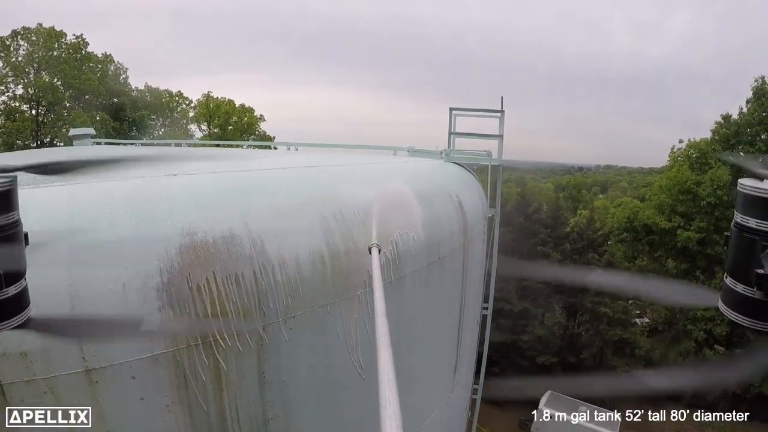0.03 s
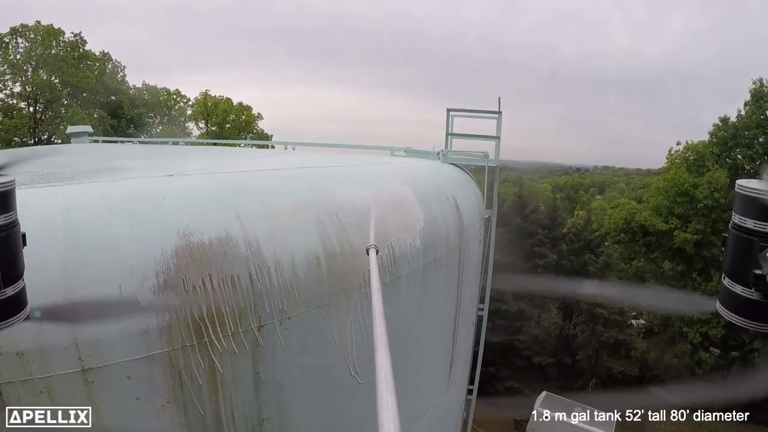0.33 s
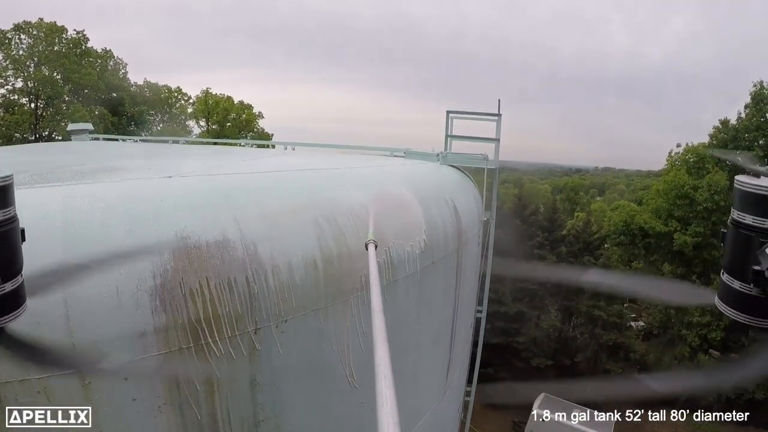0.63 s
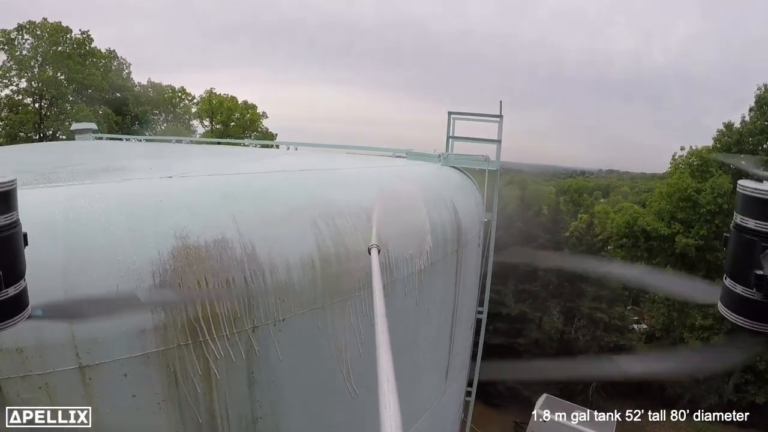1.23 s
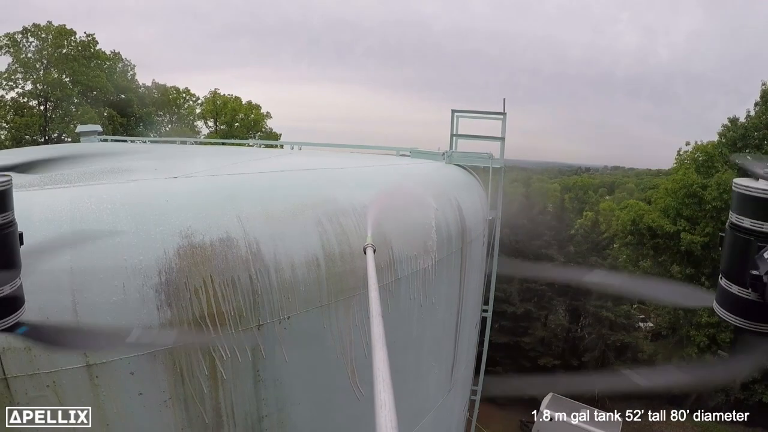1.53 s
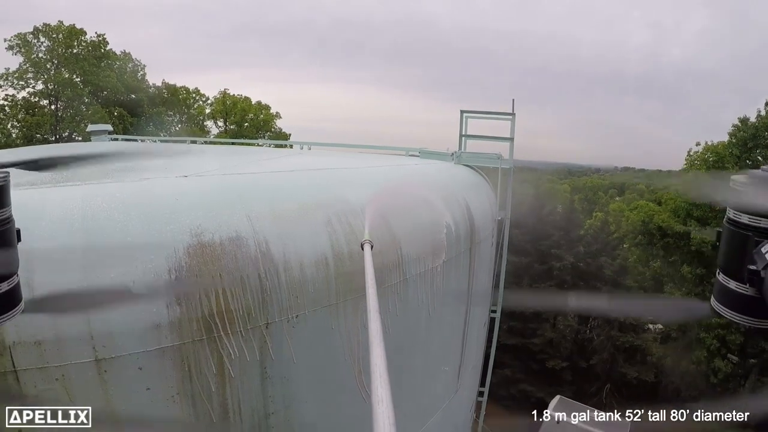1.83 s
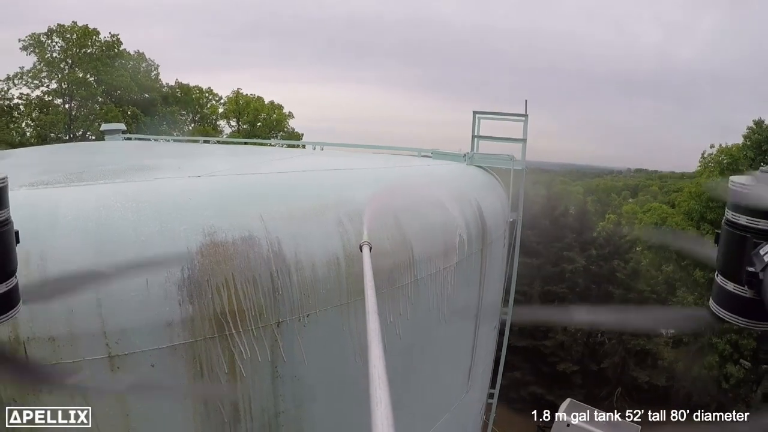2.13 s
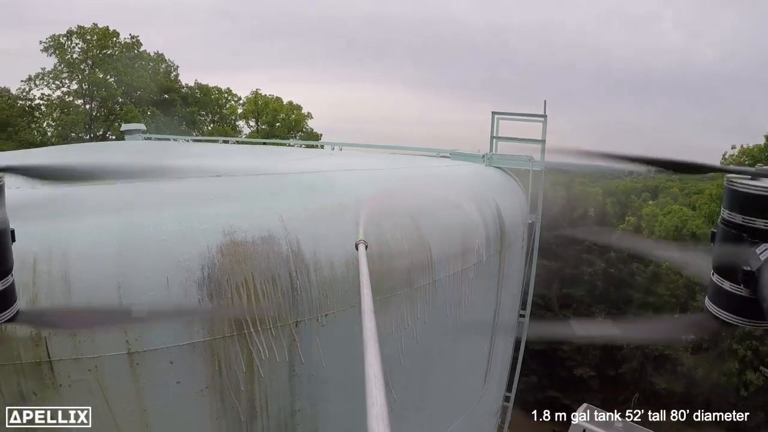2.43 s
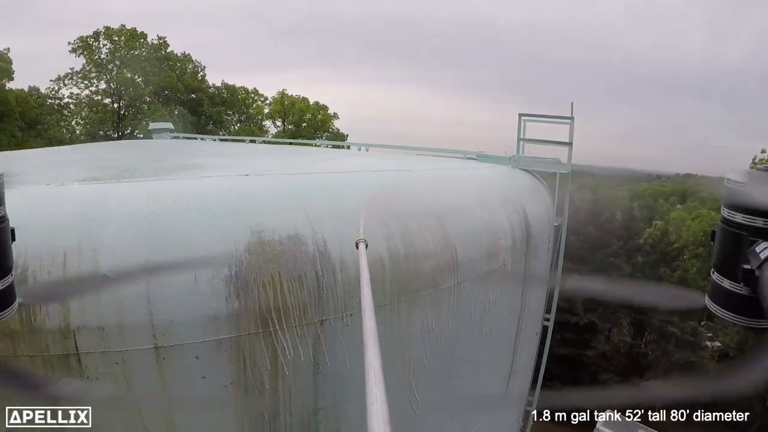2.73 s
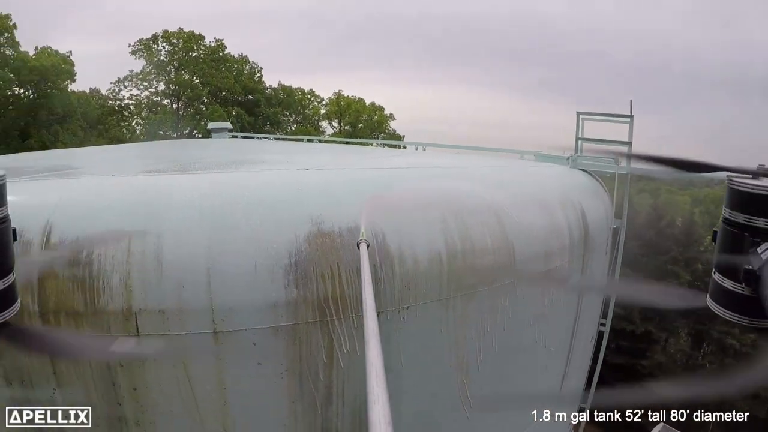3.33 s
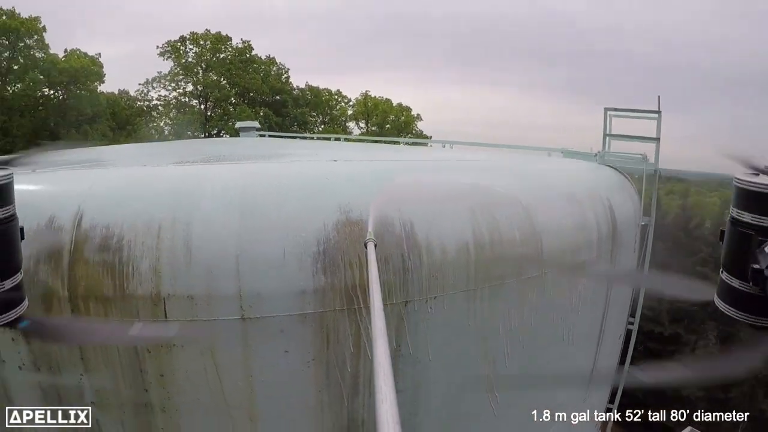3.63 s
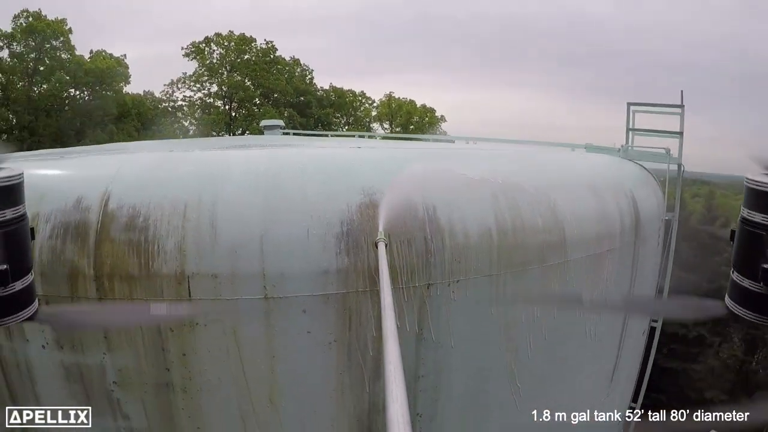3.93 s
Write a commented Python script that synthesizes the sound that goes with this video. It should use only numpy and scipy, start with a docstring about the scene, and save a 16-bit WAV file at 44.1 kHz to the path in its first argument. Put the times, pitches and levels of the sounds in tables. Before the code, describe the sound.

A heavy drone hovers outdoors, heard from its own body. Its propellers hum and roar throughout, their pitches drifting and throbbing against each other, while the motors whine thinly and a water jet hisses faintly underneath.

```python
"""A heavy drone hovers beside a storage tank and washes it with a water jet, heard from its own frame.
Its two-bladed rotors spin at slightly different, drifting speeds, so their tones clash and throb,
and each motor whines. The blades chop the roaring air they push down. Beneath that, the spray
hisses and sputters faintly, and there are three tiny ticks."""
import sys
import numpy as np
from scipy import signal
from scipy.fft import rfft, irfft
from scipy.io import wavfile
from scipy.ndimage import uniform_filter1d, minimum_filter1d

SR = 44100
rng = np.random.default_rng(int(sys.argv[2]) if len(sys.argv) > 2 else 0)


def put_to_file(sound):
    """Save the sound as 16-bit audio at rate SR, in the file named by the first command-line argument."""
    columns = np.atleast_2d(sound).T  # one column per channel
    safe = np.clip(columns, -1, 1)
    whole_steps = np.round(safe * 32767)
    wavfile.write(sys.argv[1], SR, whole_steps.astype(np.int16))


N = 176400  # 4 seconds


def undb(db):
    """Turn decibels into a number to multiply a sound by."""
    return 10 ** (np.asarray(db) / 20)


def curve(table, column=1):
    """Join one column of a time table with straight lines, giving a value for every sample."""
    rows = np.array(table, float)
    return np.interp(np.arange(N) / SR, rows[:, 0], rows[:, column])


def wander(per_s):
    """A smooth random wiggle of typical size 1, with about `per_s` new values a second."""
    freqs = np.fft.rfftfreq(N, 1 / SR)
    wiggle = irfft(rfft(rng.standard_normal(N)) * np.exp(-(2 * freqs / per_s) ** 2), N)
    return wiggle / wiggle.std()


def colour(noise, spectrum):
    """Make white noise stronger at some pitches and weaker at others, following a table."""
    hz, db = np.array(spectrum, float).T
    freqs = np.maximum(np.fft.rfftfreq(N, 1 / SR), 1)
    gain = undb(np.interp(np.log(freqs), np.log(hz), db))
    return irfft(rfft(noise) * gain, N) * np.sqrt(SR / 2)


def band_gain(sound, db, hz, width_hz):
    """Turn the part of a sound near one pitch up or down over time."""
    freqs = np.fft.rfftfreq(N, 1 / SR)
    band = irfft(rfft(sound) * np.exp(-((freqs - hz) / width_hz) ** 2), N)
    return sound + (undb(db) - 1) * band


def turn(hz, jitter=0.001578):
    """The angle of a spinning shaft whose speed keeps getting tiny adjustments."""
    speed = hz * (1 + jitter * wander(25.5))
    return 2 * np.pi * (rng.random() + np.cumsum(speed) / SR)


def tone(angle, db):
    """A pure tone at an average (rms) level, starting anywhere in its cycle."""
    return np.sqrt(2) * undb(db) * np.sin(angle + 2 * np.pi * rng.random())


def ticks(fade_s=.00004):
    """Tiny, dry clicks that start sharply and die at once."""
    # faint clicks (time [s], peak level [dB])
    clicks = [(.993, -39), (1.825, -45.5), (2.678, -39)]
    t = np.arange(N) / SR
    return sum(undb(db) * (t >= at) * np.exp(-abs(t - at) / fade_s) for at, db in clicks)


def surges(width_s=0.013):
    """Brief jumps and dips in level, in dB: the spray follows them fully, the air and rasp partly."""
    # surges and lulls (time [s], level change of the spray [dB])
    bumps = [(.09, -4), (.54, 2.5), (.72, 2.5), (.785, 2.5), (.915, -3.5), (1.12, 3.5), (1.19, 3.5),
             (1.825, 3), (2.835, 5), (2.98, 2.5), (3.04, 3.5), (3.25, -2.5), (3.335, 7), (3.569, 2.5),
             (3.635, 6), (3.72, 2.5), (3.799, 4.5), (3.9, -4)]
    t = np.arange(N) / SR
    return sum(db * np.exp(-((t - at) / width_s) ** 2) for at, db in bumps)


def spray(chop):
    """Fine droplets make a flickering hiss that the blades chop."""
    # hiss of the water (frequency [Hz], level [dB per Hz])
    spectrum = [(900, -115), (2200, -92), (2700, -101), (3050, -95.5), (3500, -99), (3750, -99),
                (3870, -92.5), (4030, -92.5), (4300, -93.5), (4720, -105), (5120, -108), (5300, -103),
                (5600, -104), (5900, -99), (6200, -100.5), (6500, -99.5), (7200, -104), (7800, -111),
                (8700, -112), (10300, -127), (11300, -133), (12600, -123), (13600, -133), (16000, -140)]
    # slow rise and fall of the hiss (time [s], level change [dB])
    drift = [(0, 0.5), (.7, 0), (1.5, -1), (2.3, 0.5), (3.1, -0.25), (4, -0.5)]
    flicker_db = 0.67 * wander(74)
    droplet_db = -wander(2000)
    gain = undb(flicker_db + droplet_db + surges() + curve(drift))
    return colour(rng.standard_normal(N) * gain * (1 + 0.35 * chop), spectrum)


def downwash(chop):
    """The swirling air pushed down by the rotors gusts, and pulses as the blades pass."""
    # roar of the air (frequency [Hz], level [dB per Hz])
    spectrum = [(15, -75.5), (36, -69.5), (52, -58), (80, -56), (125, -59.5), (165, -69.5), (195, -61),
                (228, -55.5), (292, -74), (335, -62), (388, -63), (460, -55), (540, -66.5), (660, -65.5),
                (790, -72), (850, -72), (920, -72.5), (1040, -81), (1130, -75.5), (1210, -81),
                (1320, -74.5), (1420, -77.5), (1600, -70), (1700, -75.5), (1840, -87), (2200, -94.5),
                (2700, -104), (5000, -125), (16000, -150)]
    gust = undb(1.8 * wander(90) + 0.4 * surges())
    return colour(rng.standard_normal(N) * gust * (1 + 0.49 * chop), spectrum)


def air_and_water(slow, middle, fast):
    """Air and spray pulse together with the blades of three rotors, twice for each turn."""
    # bands that swell and fade on their own (frequency [Hz], width [Hz], typical swing [dB])
    swells = [(1570, 33, 2.6), (4100, 100, 2.5)]
    chop = 0.35 * np.cos(2 * fast) + 0.11 * np.cos(2 * slow) + 0.15 * np.cos(2 * middle)
    noise = downwash(chop) + spray(chop)
    for hz, width_hz, swing_db in swells:
        noise = band_gain(noise, swing_db * wander(9.4), hz, width_hz)
    return noise


def whine(shaft_hz, db, overtones=(), poles=28, wobble=.002, flutter_db=2):
    """A motor's magnets sweep past its coils and whistle, wobbling with each change of speed."""
    angle = poles * turn(shaft_hz * (1 + wobble * wander(9)))
    level_db = db + flutter_db * wander(13)
    whistle = tone(angle, level_db)
    return whistle + sum(tone(round(k) * angle, level_db + offset) for k, offset in overtones)


def motors(slow_hz, middle_hz, fast_hz, fastest_hz):
    """The four nearest motors whine; higher whistles of the faster two come and go."""
    # whine of the faster two (time [s], fast motor level [dB], fastest motor level [dB])
    levels = [(0, -65, -60), (.52, -62, -61), (.62, -51, -62), (.88, -51.5, -62), (1.0, -60, -62),
              (1.35, -63, -61), (2.2, -64, -62), (3.08, -62, -62), (3.16, -48, -63), (3.55, -48, -64),
              (4, -47.5, -63)]
    # overtones of the fastest motor (multiple of its pitch, level next to its whine [dB])
    overtones = [(2, -18), (3, -24), (5, -35)]
    # fast motor's whistle at three times its pitch (time [s], level [dB])
    triple_level = [(0, -78), (1.2, -78), (1.7, -88), (4, -92)]
    # fastest motor's whistle at twice its pitch (time [s], level [dB])
    double_level = [(0, -78), (.45, -78), (.56, -68), (.68, -79), (1.12, -78), (1.25, -67), (1.4, -79),
                    (1.68, -79), (1.8, -68), (1.95, -77), (2.75, -76), (3.2, -80), (4, -82)]
    high = whine(3 * fast_hz, curve(triple_level)) + whine(2 * fastest_hz, curve(double_level))
    steady = whine(slow_hz, db=-61) + whine(middle_hz, db=-57.5)
    changing = whine(fast_hz, curve(levels, 1)) + whine(fastest_hz, curve(levels, 2), overtones)
    return high + steady + changing


def boom_and_hum(roar):
    """A low boom and the hum of the blades above it each swell and fade."""
    # the boom (time [s], level change [dB])
    boom = [(0, -0.5), (.35, -6.5), (.56, 4.5), (.64, 4), (.72, 8.5), (.82, 2), (1.0, -0.5), (1.5, 3),
            (2.0, 1), (2.5, 1), (3.0, 2.5), (3.35, 3.5), (3.75, 5.5), (4, 1)]
    # the blade hum (time [s], level change [dB])
    hum = [(0, -3), (.4, 0), (.8, 1), (1.5, 0), (2.2, -0.5), (2.8, .5), (3.4, 0), (4, 0)]
    roar = band_gain(roar, curve(boom), hz=217, width_hz=22)
    return band_gain(roar, curve(hum), hz=460, width_hz=83)


def blade_rasp(roar, slow, fast):
    """The rasp throbs when the blades of two neighbouring rotors pass together, and pulses each turn."""
    # slow rise and fall of the rasp (time [s], level change [dB])
    drift = [(0, 2.5), (.6, -0.5), (1.2, -1), (1.9, 2), (2.5, 1), (3.1, -1), (3.6, -1), (4, -4.5)]
    throb_db = 2.5 * np.cos(2 * (fast - slow))
    pulse_db = 1.3 * np.cos(fast)
    return band_gain(roar, curve(drift) + throb_db + pulse_db + .3 * surges(), hz=760, width_hz=200)


def rotor(angle, tones_db):
    """An off-balance shaft and its blades make a stack of tones; rough air shakes the high ones more."""
    flutter_db = 1.1 * wander(13)
    sound = np.zeros(N)
    for multiple, db in enumerate(tones_db, start=1):
        own_flutter_db = np.roll(flutter_db, rng.integers(N))  # shifted in time for each tone
        sound += tone(multiple * angle, db + min(multiple / 5, 1) * own_flutter_db)
    return sound


def far_rotors(near_speeds, drift=0.00786):
    """The farther rotors loosely follow the shared throttle and thicken the hum."""
    # one row per rotor (average shaft speed [Hz], level change [dB])
    rotors = [(45.2, -9.5), (51.3, -5.5), (55.6, -0.5), (60.3, -9.5)]
    # tones at 1, 2, 3... times the shaft speed (level before each rotor's change [dB])
    tones_db = [-53.5, -43, -65.5, -48, -59, -60, -58.5, -43, -50, -48.5, -52, -54, -58, -60, -59, -64]
    throttle = np.mean([hz / hz.mean() for hz in near_speeds], axis=0)
    sound = np.zeros(N)
    for hz, db in rotors:
        speed = hz * throttle * (1 + drift * wander(2.896))
        sound += undb(db) * rotor(turn(speed), tones_db)
    return sound


def near_rotors(angles):
    """The four nearest rotors make the main hum, each with its own mix of tones."""
    # base levels at 1, 2, 3... times the shaft speed (slow [dB], middle [dB], fast [dB], fastest [dB])
    tones_db = [(-31.5, -43, -29.5, -54.5), (-32, -50, -37.5, -49), (-64.5, -69, -64.5, -49),
                (-41.5, -38, -53, -51), (-60, -62, -60, -52), (-40.5, -48.5, -54, -46.5),
                (-51.5, -48, -47, -40), (-49, -33.3, -49, -50.5), (-47, -51.5, -53.5, -57),
                (-47, -50, -47.5, -57), (-45.5, -54, -59.5, -64), (-46.5, -54, -55.5, -67),
                (-57, -57.5, -58, -55), (-52, -55, -56, -65.5), (-56, -54, -64.5, -71.5),
                (-51, -70, -67, -64.5)]
    return sum(rotor(angle, db) for angle, db in zip(angles, np.array(tones_db).T))


def scene():
    """Four shaft speeds drive the rotor hum, the motor whine and the chopping of air and water."""
    # how fast each of the nearest rotors spins (time [s], shaft speed [Hz])
    slow_speed = [(0.0, 57.19), (0.35, 57.01), (0.7, 53.48), (1.1, 55.45), (1.55, 53.24), (2.0, 55.23),
                  (2.3, 54.14), (2.9, 53.88), (3.3, 52.3), (3.65, 53.89), (4.0, 51.86)]
    middle_speed = [(0.0, 60.67), (0.601, 57.96), (0.998, 58.89), (1.398, 59.19), (1.7, 58.49),
                    (2.053, 59.9), (2.399, 58.67), (2.951, 59.17), (3.302, 56.2), (3.598, 56.94),
                    (4.0, 55.53)]
    fast_speed = [(0.0, 64.49), (0.3, 64.02), (.52, 63), (.62, 60.9), (.79, 61.2), (.87, 60.6), (1.0, 62.1),
                  (1.3, 63.9), (1.65, 63.6), (2.1, 64.6), (2.45, 63.4), (3.03, 64.1), (3.15, 61.25),
                  (3.24, 60.35), (3.3, 61.05), (3.43, 59.8), (3.53, 60.7), (3.6, 59.1), (3.75, 60),
                  (3.93, 60.2), (4.0, 59.2)]
    fastest_speed = [(0.0, 69.8), (0.23, 70.28), (0.45, 69.32), (0.529, 66.99), (0.619, 68.48),
                     (0.72, 66.78), (0.85, 69.11), (0.96, 68.15), (1.199, 69.62), (1.55, 70.09),
                     (1.63, 69.18), (1.868, 70.46), (1.97, 69.33), (2.149, 70.72), (2.849, 68.56),
                     (3.02, 70.25), (3.202, 66.98), (3.698, 66.63), (4.0, 67.8)]
    speeds = [curve(table) for table in (slow_speed, middle_speed, fast_speed, fastest_speed)]
    angles = [turn(hz) for hz in speeds]
    slow, middle, fast, _ = angles
    roar = near_rotors(angles) + far_rotors(speeds) + air_and_water(slow, middle, fast)
    roar = boom_and_hum(roar)
    roar = blade_rasp(roar, slow, fast)
    return (roar + motors(*speeds) + ticks())[None]


def record(dry):
    """A limiter turns down the loudest peaks, and the very highest treble is cut."""
    limit_db, hold_s, top_hz = -14.3, .012, 15700
    hold = int(hold_s * SR)
    gain = np.minimum(1, undb(limit_db) / (abs(dry) + 1e-9))
    gain = minimum_filter1d(gain, hold)  # stay down around each peak
    gain = uniform_filter1d(uniform_filter1d(gain, hold // 2), hold // 2)  # ease down and back up
    treble_cut = signal.ellip(8, .2, 70, top_hz, fs=SR, output="sos")
    return signal.sosfilt(treble_cut, dry * gain)


dry = scene()
out = record(dry)
put_to_file(out)
```